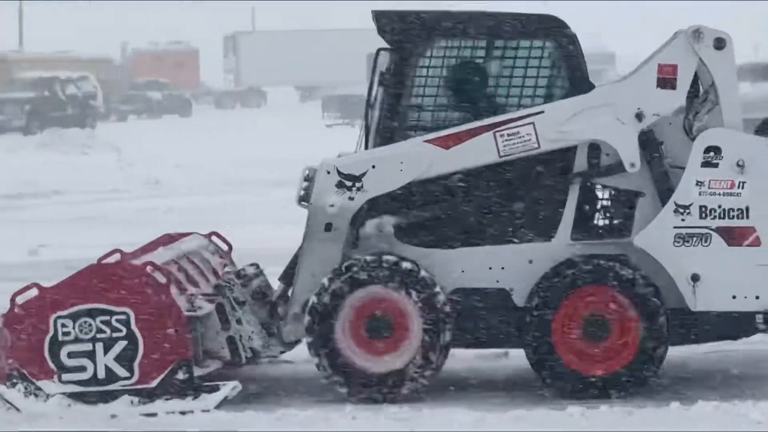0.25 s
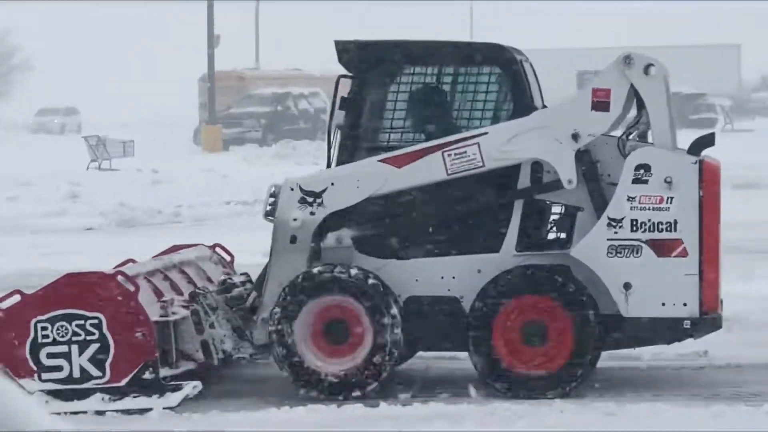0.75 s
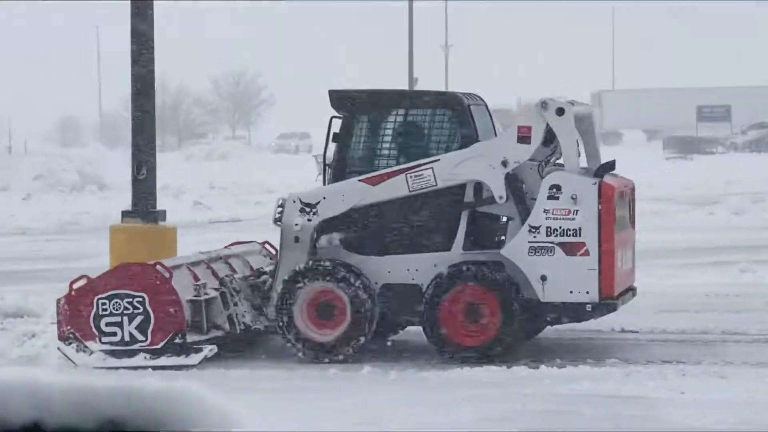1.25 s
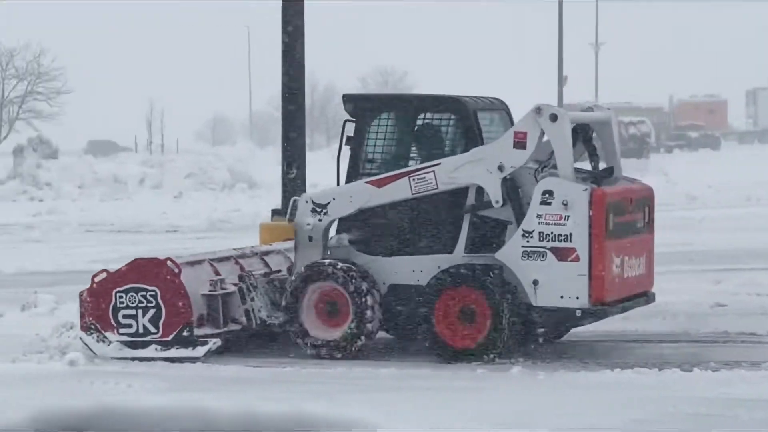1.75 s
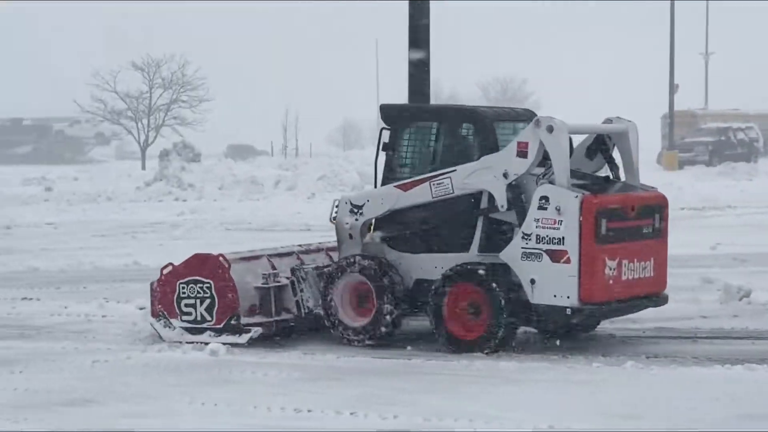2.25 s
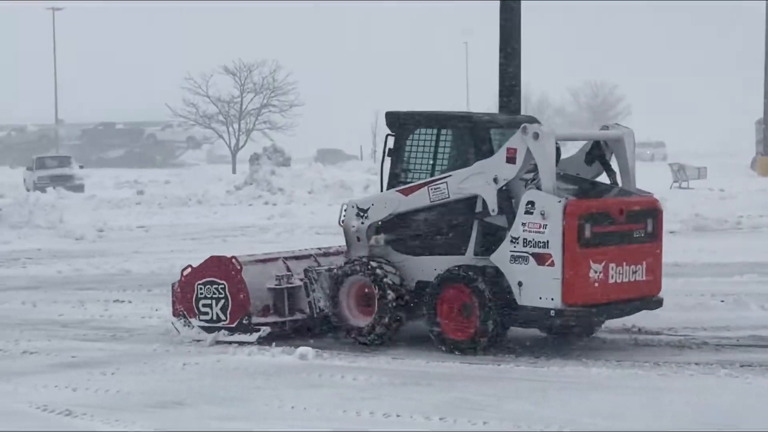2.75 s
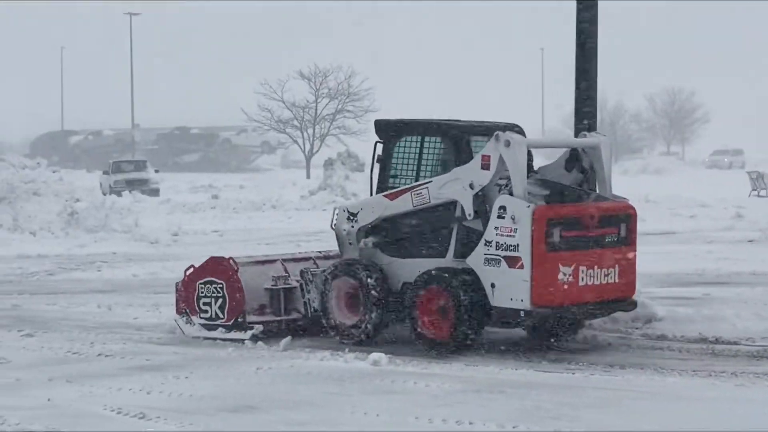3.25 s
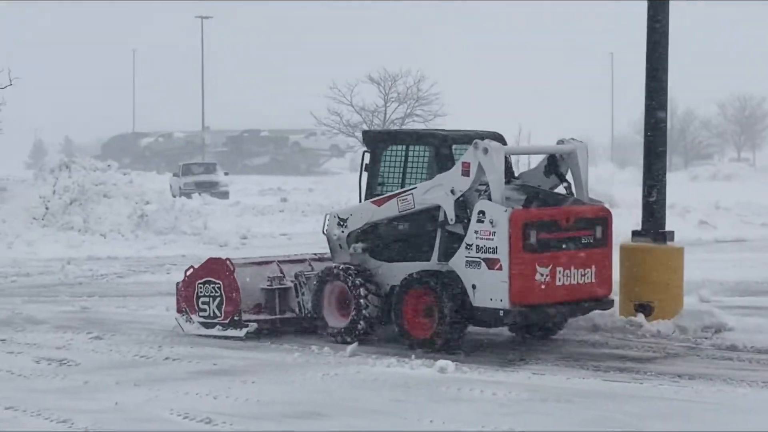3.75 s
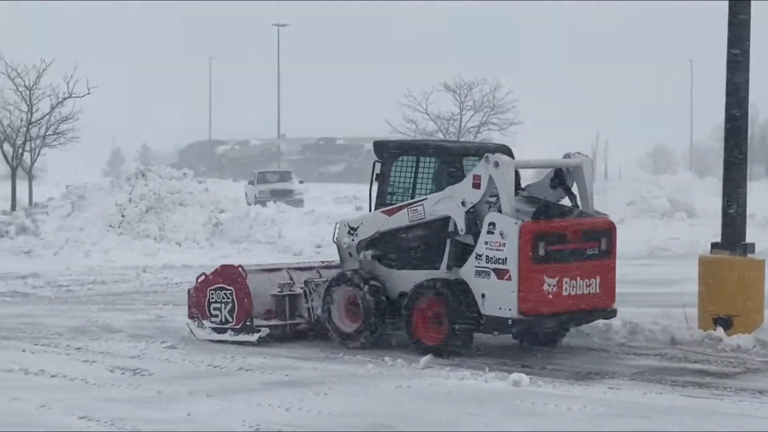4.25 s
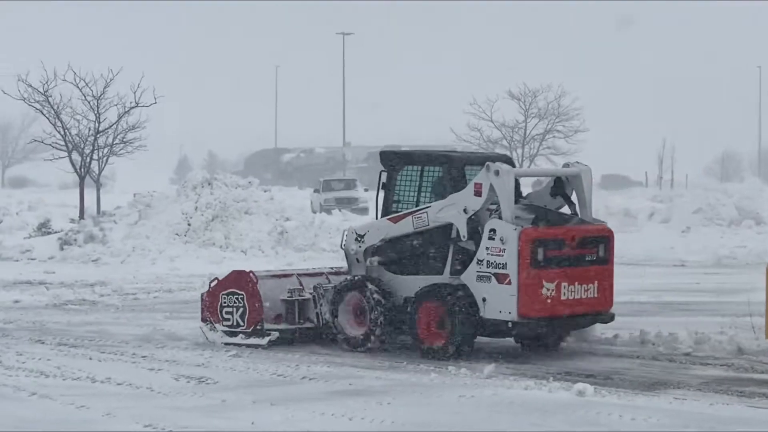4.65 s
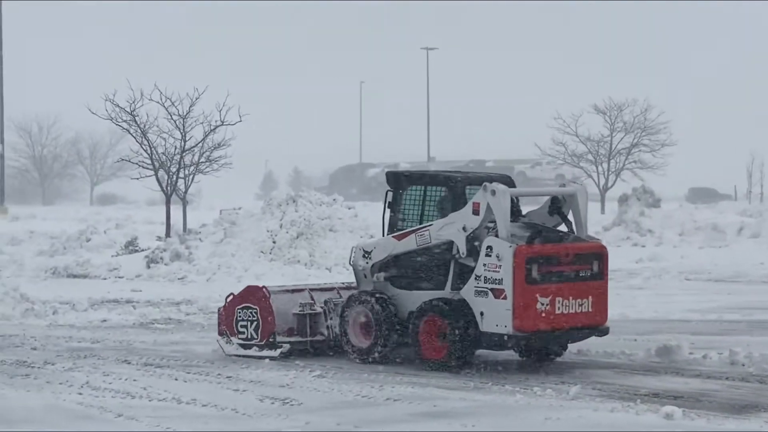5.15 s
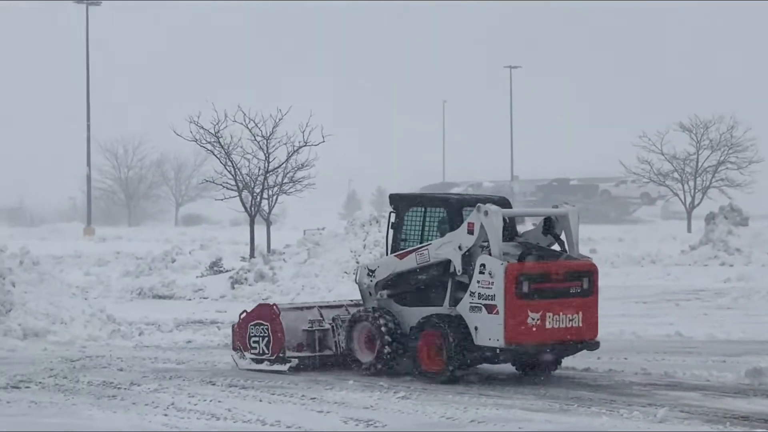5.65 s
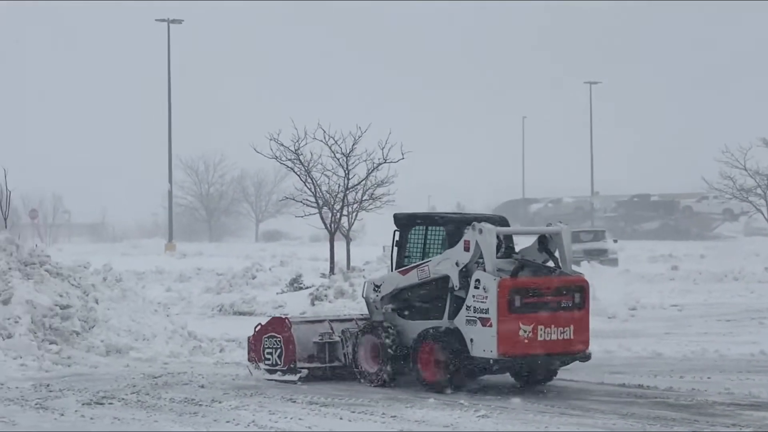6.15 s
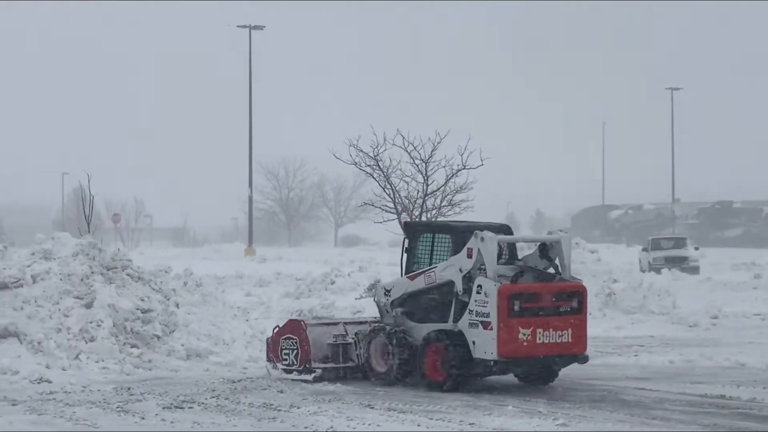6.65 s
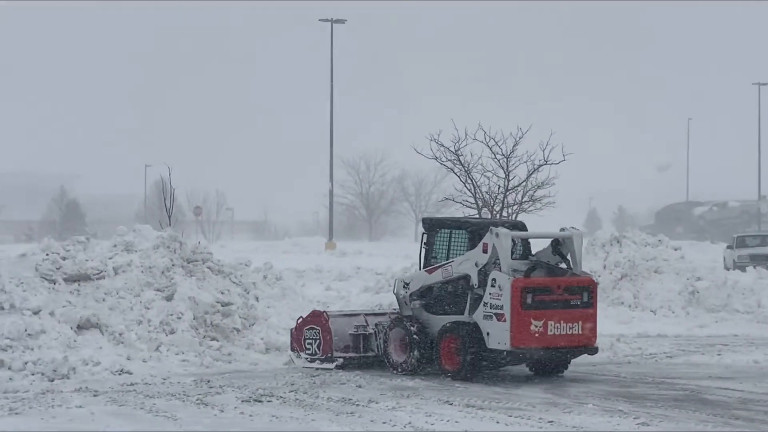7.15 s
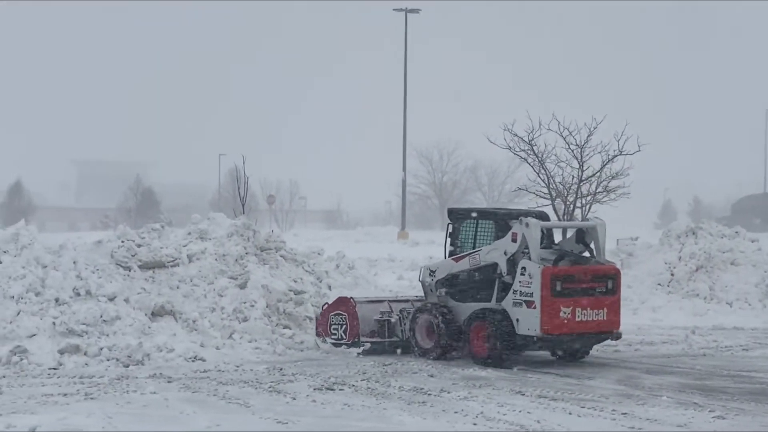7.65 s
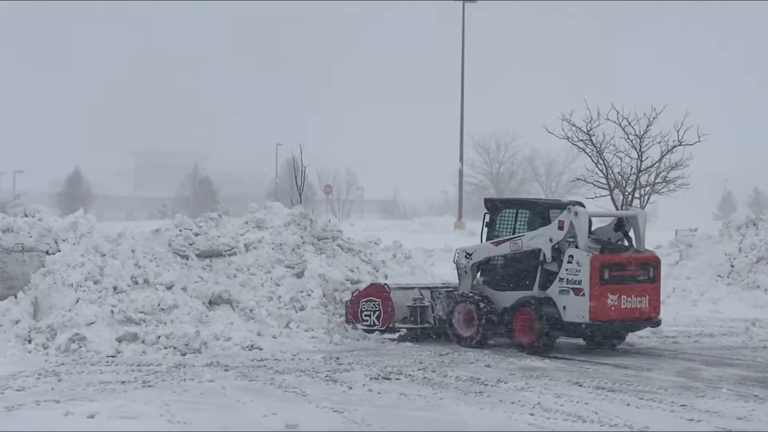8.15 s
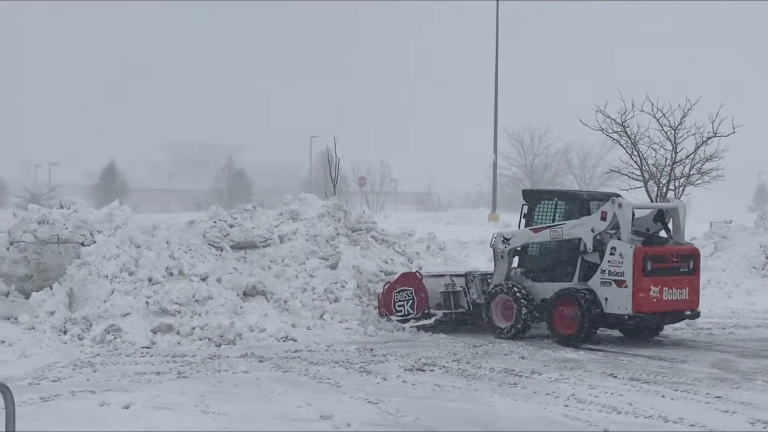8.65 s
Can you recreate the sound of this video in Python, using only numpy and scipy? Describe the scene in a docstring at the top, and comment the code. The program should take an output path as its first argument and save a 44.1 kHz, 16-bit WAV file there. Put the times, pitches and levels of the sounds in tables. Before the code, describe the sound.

Outdoors in an open snowy lot, a small diesel loader runs hard close to the microphone, with a low steady drone, whining drive pump, fan rush and gritty snow crunch. A short gust passes early. The machine slowly recedes with groans and faint skid whistles. Past the middle, strong wind buffets the microphone, the drone drops away quickly, and fan, clatter and crunch remain between irregular thumps.

```python
"""A diesel skid-steer loader pushes snow across an open lot at full throttle, close by and slowly receding.
From the start four cylinders drone, the drive pump whines, fan and engine bay rush, and snow crunches.
Bands of machine noise glide in pitch, a short gust passes near 1 s, drive and skids groan and whistle.
In the second half gusts and eddies buffet the microphone, the drone fades, and a high click falls near 8 s.
Engine, pump and snow bursts follow one count of cylinder firings; the rest is shaped noise and swings."""
import sys
import numpy as np
from scipy import signal
from scipy.fft import rfft, irfft, next_fast_len
from scipy.io import wavfile
from scipy.ndimage import uniform_filter1d, map_coordinates

SR = 44100
rng = np.random.default_rng(int(sys.argv[2]) if len(sys.argv) > 2 else 0)


def unload_audio(sound):
    """Save the sound as a 16-bit wav file, at the path given as the first command line argument."""
    columns = np.transpose(np.atleast_2d(sound))
    # keep every value between -1 and 1, then stretch to whole-number steps
    steps = np.round(np.clip(columns, -1, 1) * 32767)
    wavfile.write(sys.argv[1], SR, steps.astype(np.int16))


N = 392931


def amp(db):
    """Decibels to gain."""
    return 10 ** (np.asarray(db) / 20)


def unit(x):
    """Scaled to rms 1."""
    return x / np.sqrt(np.mean(x ** 2) + 1e-20)


def curves(rows):
    """One value per sample for each column after the time."""
    knots_s, *columns = np.transpose(rows)
    return [np.interp(np.arange(N) / SR, knots_s, column) for column in columns]


def wobble(knots_hz):
    """A smooth random curve with knots_hz knots a second."""
    knots = rng.standard_normal(int(N * knots_hz / SR) + 4)
    return map_coordinates(knots, [np.arange(N) * knots_hz / SR])


def swell(start_s, length_s, rise_s, fall_s):
    """A Gaussian-edged envelope that reaches 1 at start_s, holds for length_s and falls."""
    t = np.arange(N) / SR
    outside = np.maximum((start_s - t) / rise_s, (t - start_s - length_s) / fall_s)
    return np.exp(-np.clip(outside, 0, 2 * np.pi) ** 2)


def filtered(x, response):
    """x times a response of frequency."""
    m = next_fast_len(N + SR // 2)
    spectrum = rfft(x, m) * response(np.fft.rfftfreq(m, 1 / SR))
    return irfft(spectrum, m)[..., :N]


def along(points, hz):
    """Gain of (Hz, dB) points, read on a log axis."""
    points_hz, points_db = np.transpose(points)
    return amp(np.interp(np.log(hz + 1), np.log(points_hz), points_db))


def coloured(x, points):
    """x through a (Hz, dB) spectrum, at rms 1."""
    return unit(filtered(x, lambda hz: along(points, hz)))


def resonance(hz, centre_hz, width_hz):
    """Response of one damped mode."""
    damping = 1j * hz * width_hz
    return damping / (centre_hz ** 2 - hz ** 2 + damping)


def noise(side_db):
    """White stereo noise: a shared mid plus a side at side_db that is opposed in the two channels."""
    mid, side = rng.standard_normal((2, N))
    return unit(np.array([mid + amp(side_db) * side, mid - amp(side_db) * side]))


def tone(cycles, drift_rad, shimmer_db):
    """A tone of rms 1 that wavers in phase and strength."""
    wave = np.sin(2 * np.pi * cycles + drift_rad * wobble(9))
    return unit(wave * amp(shimmer_db * wobble(22.03)))


def howl(centre_hz, half_width_hz):
    """A narrow band of noise at rms 1 around a moving pitch, 12 dB down at half_width_hz."""
    a, b = filtered(rng.standard_normal((2, N)), lambda hz: 1 / (1 + (hz / half_width_hz) ** 2) ** 2)
    phase = 2 * np.pi * np.cumsum(centre_hz) / SR
    return unit(a * np.cos(phase) + b * np.sin(phase))


def patchy(x, depth_db):
    """Gives noise slowly shifting patches of strength across frequency."""
    bins = signal.stft(x, nperseg=1024)[2]
    patch = np.outer(np.hanning(7), np.hanning(21))
    field = signal.fftconvolve(rng.standard_normal(bins.shape[1:]), patch, "same")
    return signal.istft(bins * amp(depth_db * unit(field)), nperseg=1024)[1][:, :N]


def steady(x):
    """Noise with its fast lumps kept and its slow swells evened out."""
    power = uniform_filter1d(np.mean(x ** 2, axis=0), size=1500)
    return x / np.sqrt(np.abs(power) + 1e-9)


def firing_gate(firings, depth, scatter_db):
    """A burst at each firing, with random differences in strength."""
    burst = np.sin(np.pi * firings) ** 2
    strength_db = scatter_db * rng.standard_normal(1024)[firings.astype(int)]
    return unit(amp(strength_db * burst) * np.exp(2 * depth * burst))


# Engine speed, sagging under load. Each row: time in seconds, firing rate in Hz.
ENGINE_SPEED = [(0, 87.6), (.5, 88.5), (.78, 87.3), (1.0, 89.7), (1.35, 86), (1.57, 85), (1.8, 88),
                (2.02, 88.9), (2.3, 85.3), (2.6, 87), (3.2, 86.9), (3.5, 88.7), (3.9, 87.4), (4.15, 84.7),
                (4.45, 87.3), (6.2, 87.4), (7.3, 80), (8.1, 82), (8.9, 91)]


def firing_rate_hz():
    """Cylinder firings per second, the pace of the engine and the pump."""
    return curves(ENGINE_SPEED)[0]


FADE_STARTS_S, FADE_TIME_S, FADE_LOSS_DB = 5.73, 0.24, 21.5


def fade_db():
    """How far drone and pump whine have sunk: a quick exponential approach in dB."""
    since_s = np.maximum(np.arange(N) / SR - FADE_STARTS_S, 0)
    return FADE_LOSS_DB * np.expm1(-since_s / FADE_TIME_S)


# Shaft and belt tones. Each row: multiple of the firing rate, dB against the firing tone before lugging.
SHAFT_TONES = [(1.55, -30), (2, -21.5), (3.5, -20.5), (4.68, -27.5), (6.67, -24)]
# Hums that hold their pitch whatever the load. Each row: pitch in Hz, dB against the firing tone.
STEADY_HUMS = [(40, -20.5), (70, -14), (119, -15.5), (205.5, -14)]
DRONE_DB = -22  # firing tone before the fade
LUG_HZ, LUG_DB_PER_HZ, LUG_MOST_DB = 87, 3, 5  # shaft tones swell below this firing rate


def exhaust(firings):
    """A clean firing tone among steady hums and weaker shaft tones, which swell when the engine labours."""
    firing = tone(firings, drift_rad=.03, shimmer_db=.4)
    shafts = sum(amp(db) * tone(multiple * firings, drift_rad=0.24 * multiple, shimmer_db=2.5)
                 for multiple, db in SHAFT_TONES)
    lug_db = np.clip(LUG_DB_PER_HZ * (LUG_HZ - firing_rate_hz()), 0, LUG_MOST_DB)
    hums = sum(amp(db) * tone(hz * np.arange(N) / SR, drift_rad=0.23, shimmer_db=1.5)
               for hz, db in STEADY_HUMS)
    drone = firing + amp(lug_db) * shafts + hums
    return amp(DRONE_DB + fade_db()) * drone * amp([[-.4], [.4]])  # slightly right


# The drive pump as it takes load. Each row: time in seconds, whine in dB before the fade.
PUMP_WHINE = [(0, -35), (.35, -33.5), (.45, -37.5), (.75, -41), (.86, -34.5), (1.0, -30.5), (1.25, -29.5),
              (1.57, -26.5), (1.77, -34.5), (2.02, -26.5), (2.15, -31.5), (2.28, -39.5), (4.0, -41.5),
              (4.2, -36), (5.8, -37.5)]
SING_HZ, SING_HALF_WIDTH_HZ, SING_DB, SING_ENDS_S, SING_FALL_S = 2955, 41, -52, 0.48, 0.44


def pump(firings):
    """The belt-driven piston pump whines louder under load; a thin whistle sings above it while side-on."""
    load = amp(curves(PUMP_WHINE)[0] + fade_db())
    strokes = 5.35 * firings
    whine = tone(strokes, drift_rad=.15, shimmer_db=.8)
    ripple = amp(1.6 * wobble(70))
    side_on = swell(0, SING_ENDS_S, SING_FALL_S, SING_FALL_S)
    whistle = howl(np.full(N, SING_HZ), SING_HALF_WIDTH_HZ)
    return load * unit(ripple * whine) + amp(SING_DB) * side_on * whistle


SIDE_ON_S, TURN_S = 1.34, 1.27  # stays side-on, then turns its tail
GROWL_DB, GROWL_HZ, GROWL_WIDTH_HZ = -28, 186, 136  # width of each of two equal passes


def growl(firings):
    """The engine bay growls out of its side: a throaty band that pulses with the firings."""
    throb = noise(side_db=-16.0) * firing_gate(firings, depth=0.38, scatter_db=-0.5)
    bay = unit(filtered(throb, lambda hz: resonance(hz, GROWL_HZ, GROWL_WIDTH_HZ) ** 2))
    return amp(GROWL_DB) * swell(0, SIDE_ON_S, TURN_S, TURN_S) * bay


# The machine as it turns and recedes. Each row: time in seconds, fan in dB, clatter in dB, before trims.
MACHINE_LEVELS = [(0, -36.5, -46.5), (.17, -35.5, -43), (.46, -40, -48), (1.87, -34, -44), (2.25, -37, -43),
                  (3.03, -34, -45.5), (4.7, -35, -43.5), (5.26, -32, -42), (5.7, -34, -44),
                  (5.94, -35.5, -48.5), (6.01, -32.5, -46), (6.86, -36, -47), (7.35, -36, -47.5),
                  (7.68, -34, -48.5), (7.9, -33.5, -45.5), (8.31, -34.5, -46), (8.46, -35.5, -45),
                  (8.7, -35, -49.5)]
# Exhaust and chassis roar. Each row: frequency in Hz, relative density in dB per Hz.
BODY_SPECTRUM = [(22, -48), (31, -35), (40, 1), (60, -1), (85, 2), (112, 5.5), (150, -3), (200, -4),
                 (340, -9.5), (560, -8), (740, -11), (1000, -19), (1330, -42), (4500, -120)]
# Fan duct modes. Each row: centre in Hz, width in Hz, relative gain in dB.
DUCT_MODES = [(1043, 68.6, 18), (1100, 157, 8.5)]
# Combustion clatter. Each row: frequency in Hz, relative density in dB per Hz.
CLATTER_SPECTRUM = [(900, -44), (1380, -12), (1570, 5), (1900, 3), (2800, 1), (3400, -2.5), (3900, -7),
                    (4400, -8), (5500, -23), (7500, -45), (11000, -120)]
BODY_DB, BODY_FADE_SHARE = -26.5, 0.19  # roar before its share of the drone's fade


def duct(hz):
    """The fan duct's modes, each a resonance narrowed by a wider one at the same pitch."""
    return sum(amp(db) * resonance(hz, centre_hz, width_hz) * resonance(hz, centre_hz, 5 * width_hz)
               for centre_hz, width_hz, db in DUCT_MODES)


def machine(firings, sway_db):
    """Chassis roar, the fan in its duct, and combustion clatter; roar and clatter pulse with the firings."""
    fan_db, clatter_db = curves(MACHINE_LEVELS)
    roar = noise(side_db=-16.5) * firing_gate(firings, depth=0.14, scatter_db=1.35)
    body = coloured(roar, BODY_SPECTRUM)
    fan = unit(filtered(noise(side_db=-6.5), duct)) * amp([[-1.1], [1.1]])
    knocks = patchy(noise(side_db=-46.0), depth_db=1.54)
    knocks = knocks * firing_gate(firings, depth=0.022, scatter_db=1.5)
    clatter = coloured(knocks, CLATTER_SPECTRUM)
    body = amp(BODY_DB + BODY_FADE_SHARE * fade_db()) * body
    return body + amp(fan_db + 0.5) * fan + amp(clatter_db + 4.5 + sway_db) * clatter


# Snow under blade and tyres. Each row: time in seconds, crunch in dB, fizz in dB, before trims.
SNOW_LEVELS = [(0, -52.5, -59), (.15, -49, -58), (.5, -54.5, -61), (1.04, -54, -62), (1.96, -49.5, -57),
               (2.55, -51, -60), (2.71, -54, -59), (2.8, -49, -58.5), (3.3, -52, -59.5),
               (5.34, -50.5, -60.5), (6.33, -55.5, -65.5), (6.6, -53.5, -61), (6.7, -56, -66),
               (7.03, -54, -62.5), (7.12, -56, -64), (7.4, -55.5, -64), (7.55, -53, -60),
               (7.7, -54.5, -60.5), (7.99, -49.5, -59), (8.26, -54.5, -62.5), (8.41, -50, -62),
               (8.64, -59, -67), (8.76, -50.5, -63), (8.91, -58, -65)]
# Snow crunch. Each row: frequency in Hz, relative density in dB per Hz.
CRUNCH_SPECTRUM = [(2000, -17), (4000, -1), (5000, 4), (6700, -.5), (8000, -4), (10000, -18.5),
                   (13000, -23)]
# Fizz of fine powder. Each row: frequency in Hz, relative density in dB per Hz.
FIZZ_SPECTRUM = [(6000, -26), (8800, -1.5), (11000, 1), (12300, -7), (15500, -8.5)]
# Treble balance; some bands are opposed between channels. Each row: frequency in Hz, side against mid in dB.
TREBLE_SIDE = [(3000, -6), (5800, -8), (7700, -35), (8400, 27.5), (9700, -2.5), (11000, -8), (12300, -4),
               (13600, 17), (15500, -6)]


def snow(firings, sway_db):
    """Snow crunches unevenly under the shuddering blade, with a finer fizz above."""
    crunch_db, fizz_db = curves(SNOW_LEVELS)
    mid, side = patchy(rng.standard_normal((2, N)), depth_db=2.0)
    mid = filtered(mid, lambda hz: np.cos(np.arctan(along(TREBLE_SIDE, hz))))
    side = filtered(side, lambda hz: np.sin(np.arctan(along(TREBLE_SIDE, hz))))
    shudder = amp(sway_db + 0.28 * wobble(170)) * firing_gate(firings, depth=0.085, scatter_db=1.3)
    grains = np.array([mid + side, mid - side]) * shudder
    crunch = amp(crunch_db + 2.0) * coloured(grains, CRUNCH_SPECTRUM)
    return crunch + amp(fizz_db + 2.5) * coloured(grains, FIZZ_SPECTRUM)


# Whirr of the drive motors. Each row: time in seconds, pitch in Hz, level in dB before a trim.
MOTOR_WHIRR = [(1.5, 3040, -60), (2.7, 3060, -48.5), (3.6, 3325, -47.5), (4.3, 3293, -40), (5.4, 3307, -48),
               (6.6, 3470, -43), (7.4, 3420, -47), (8.3, 3400, -50), (8.9, 3330, -45)]
# Steel skids on packed snow. Each row: start in seconds, length in seconds, pitch in Hz, level in dB.
SKID_WHISTLES = [(2.3, 0.36, 4680, -51.5), (3.901, .5, 4540, -51.5), (4.804, .15, 4660, -54),
                 (5.254, .2, 4570, -50), (6.398, .19, 4480, -57)]
SKID_RISE_S, SKID_FALL_S, SKID_WANDER_HZ = 0.16, 0.12, 59.1


def running_gear():
    """The drive motors whirr, and the skids whistle unsteadily whenever they bite."""
    whirr_hz, whirr_db = curves(MOTOR_WHIRR)
    whirr = amp(whirr_db - 4.5) * howl(whirr_hz, half_width_hz=420)
    bite = sum(amp(db) * swell(s, length_s, SKID_RISE_S, SKID_FALL_S)
               for s, length_s, _, db in SKID_WHISTLES)
    pitch_hz, = curves([(s + length_s / 2, hz) for s, length_s, hz, _ in SKID_WHISTLES])
    whistle = howl(pitch_hz + SKID_WANDER_HZ * wobble(4), half_width_hz=250)
    return whirr + bite * whistle


def glides(rows, rise_s, fall_s):
    """Narrow bands of noise that swell, glide in pitch and fall."""
    out = 0
    for s, length_s, first_hz, last_hz, half_width_hz, db in rows:
        glide_hz, = curves([(s, first_hz), (s + length_s, last_hz)])
        out = out + amp(db) * swell(s, length_s, rise_s, fall_s) * howl(glide_hz, half_width_hz)
    return out


# Peaks of the ground reflection. Each row: start in seconds, length in seconds, first pitch in Hz,
# last pitch in Hz, half-width in Hz, level in dB before the sway.
REFLECTION_GLIDES = [(.1, 0.33, 1744, 1723, 300, -40.5), (.3, 0.18, 1725, 1735, 45, -48),
                     (.65, 0.33, 1750, 1740, 150, -45), (.97, 0.14, 1703, 1624, 60, -44),
                     (1.25, 0.053, 1620, 1625, 90, -38), (1.5, 0.069, 1618, 1605, 50, -43.5),
                     (1.68, 0.38, 1873, 1840, 70, -49), (1.85, 0.58, 1570, 1472, 55, -45.5),
                     (2.22, 0.23, 1790, 1700, 70, -43.5), (2.55, .5, 1744, 1738, 110, -42.5),
                     (2.68, .08, 1500, 1470, 35, -46), (3.0, 0.18, 1500, 1480, 55, -48),
                     (3.15, 0.28, 1675, 1637, 55, -45), (3.2, 1.19, 1760, 1800, 130, -48),
                     (3.5, 0.22, 1637, 1625, 50, -43), (3.8, 0.41, 1665, 1680, 70, -55),
                     (4.4, .22, 1610, 1612, 55, -43.5), (4.6, 1.12, 1753, 1773, 110, -41.5),
                     (4.85, 0.97, 1584, 1660, 90, -51), (6.0, .45, 1710, 1715, 130, -48)]


def ground_reflection():
    """Bands of machine noise glide in pitch as the ground reflection shifts."""
    return glides(REFLECTION_GLIDES, rise_s=.12, fall_s=.13)


# Gusts at the microphone. Each row: start in seconds, length in seconds, rumble in dB, flutter in dB,
# before trims.
WIND_GUSTS = [(0.926, 0.49, -36, -23.5), (5.106, 0.01, -23, -21.5), (5.152, 0.048, -15.3, -20),
              (5.231, 0.024, -15.7, -29), (5.333, 0.015, -15, -21.5), (5.414, 0.035, -13, -24),
              (5.482, 0.047, -19.5, -31), (5.57, 0.0099, -21, -39), (5.627, 0.053, -20.5, -31),
              (5.702, 0.075, -12, -18.5), (5.815, 0.058, -20.5, -22.5), (5.892, 0.0065, -23, -22),
              (6.019, 0.028, -28, -36), (6.12, 0.087, -28, -35.5), (6.232, 0.035, -23, -26),
              (6.295, 0.06, -27.5, -26), (6.391, 0.01, -23, -27.5), (6.436, 0.055, -28, -27),
              (6.511, 0.022, -22, -26.5), (6.569, 0.037, -27.5, -28), (6.8, 0.057, -29, -32),
              (6.896, 0.067, -25, -30), (7, 0.06, -33, -32.5), (7.118, 0.066, -26, -31),
              (7.233, 0.067, -25, -28), (7.373, 0.033, -27.1, -28.5), (7.588, 0.04, -30, -27),
              (7.691, 0.025, -28.5, -27.5), (7.788, 0.068, -32, -29), (8.055, 0.033, -24, -28),
              (8.12, 0.028, -22, -21.5), (8.245, 0.0088, -18.5, -25.5), (8.27, 0.087, -21, -21),
              (8.373, 0.039, -15, -17.5), (8.481, 0.066, -21, -22.5), (8.671, 0.057, -20.5, -24.5),
              (8.777, 0.049, -17.5, -20), (8.852, 0.05, -20.5, -25.5)]
# Flutter reach as the wind freshens. Each row: time in seconds, corner in Hz.
FLUTTER_REACH = [(1.3, 185), (5.2, 370), (5.8, 537), (6.3, 700), (7.8, 775), (8.3, 1160)]
# Wind rumble. Each row: frequency in Hz, relative density in dB per Hz.
RUMBLE_SPECTRUM = [(20, -37), (35, -16), (55, 0), (110, -3), (170, -8), (300, -18), (700, -92), (2000, -94)]
GUST_RISE_S, GUST_FALL_S = 0.0084, 0.014
WIND_RISES_S = 5.8  # from then on the air stirs between gusts too
LULL_RUMBLE_DB, LULL_FLUTTER_DB = -33.5, -37.5  # before trims


def flutter_response(hz, corner_hz):
    """A highpass, a gentle slope, and a steep cut at corner_hz."""
    highpass = hz ** 2 / (hz ** 2 + 135 ** 2)
    return highpass / np.sqrt(1 + (hz / 300) ** 2) / np.sqrt(1 + (hz / corner_hz) ** 10)


def buffet(rumble_trim_db, flutter_trim_db):
    """Turbulence at the ports in each gust: a lumpy rumble, and a flutter that reaches higher in faster air."""
    lull = swell(WIND_RISES_S, N / SR, GUST_RISE_S, GUST_FALL_S)
    low, high = amp(LULL_RUMBLE_DB) * lull, amp(LULL_FLUTTER_DB) * lull
    for s, length_s, low_db, high_db in WIND_GUSTS:
        gust = swell(s, length_s, GUST_RISE_S, GUST_FALL_S)
        low = np.maximum(low, amp(low_db) * gust)
        high = np.maximum(high, amp(high_db) * gust)
    rumble = steady(coloured(noise(side_db=-12.5), RUMBLE_SPECTRUM))
    reach_hz, = curves(FLUTTER_REACH)
    air = noise(side_db=-10.0) * amp(5.4 * wobble(130))
    flutter = 0
    for corner_hz in 160 * 2 ** np.arange(4):  # crossfade between octave-spaced corners
        share = np.clip(1 - np.abs(np.log2(reach_hz / corner_hz)), 0, 1)
        flutter = flutter + share * unit(filtered(air, lambda hz: flutter_response(hz, corner_hz)))
    return amp(rumble_trim_db) * low * rumble + amp(flutter_trim_db) * high * steady(flutter)


# Single eddies that slap the microphone. Each row: peak time in seconds, peak level in dB before trim
# and random pan, pitch at the peak in Hz.
EDDY_SLAPS = [(1.1217, -23, 254), (1.1481, -14, 285), (1.1897, -16.3, 283.0), (1.2207, -20, 500),
              (1.297, -14, 178), (1.416, -17, 170), (1.6998, -12, 630), (5.148, -10, 226),
              (5.176, -15, 283.0), (5.2429, -15, 400.0), (5.3404, -9.5, 453), (5.4183, -19, 317.0),
              (5.429, -10, 252.0), (5.4464, -14, 449.0), (5.572, -8, 109), (5.717, -10.7, 317.0),
              (5.7434, -4.5, 354), (5.7645, -11.7, 566.0), (5.7738, -14, 317.0), (5.7848, -17, 283.0),
              (5.8036, -5, 440), (5.8332, -10, 500), (5.8411, -8.5, 490), (6.241, -18, 356.0),
              (6.2584, -12, 447), (6.308, -15.5, 400.0), (6.352, -16, 317.0), (6.439, -15, 400.0),
              (6.4834, -16, 449.0), (6.4961, -12.9, 630), (6.5725, -18.5, 449.0), (6.5825, -14, 356.0),
              (6.704, -20, 300), (6.8899, -18.2, 449.0), (6.9062, -15, 449.0), (6.9359, -16, 635.0),
              (7.0116, -10, 453), (7.1226, -19.9, 449.0), (7.177, -20, 500), (7.2484, -17, 504.0),
              (7.2616, -17, 504.0), (7.278, -13, 400.0), (7.3813, -13.5, 497), (7.3966, -17.2, 566.0),
              (7.6026, -19, 449.0), (7.791, -17, 397), (7.8484, -18.5, 500), (8.1105, -21, 800),
              (8.1228, -10, 398), (8.1374, -8.5, 500), (8.18, -11.5, 566.0), (8.214, -15, 595),
              (8.2758, -13, 566.0), (8.288, -10, 713.0), (8.306, -14.0, 557), (8.3258, -13.7, 504.0),
              (8.3355, -12, 504.0), (8.3457, -13, 566.0), (8.3826, -11, 252.0), (8.403, -7, 696),
              (8.465, -5, 560), (8.4896, -11, 800.0), (8.5094, -15, 700), (8.5415, -18, 800.0),
              (8.666, -16, 950), (8.676, -15, 449.0), (8.6846, -14.4, 400.0), (8.7065, -15, 504.0),
              (8.7825, -18, 713.0), (8.809, -9.5, 635.0), (8.8573, -15, 560), (8.8693, -10.5, 449.0)]
EDDY_RISE_CYCLES, EDDY_FALL_CYCLES, EDDY_SLOWS_PER_CYCLE, EDDY_END_SHARE = .95, 1.1, .7, .28


def eddies(trim_db):
    """Each eddy is a swing of pressure that starts fast and small, swells as it slows, and dies low."""
    out, lead = np.zeros((2, N + SR)), SR // 50
    t = np.arange(-lead, SR // 12) / SR
    for s, db, hz in EDDY_SLAPS:
        phase_cycles, pan_db = rng.standard_normal(2)
        age = np.maximum(hz * t, -np.pi)  # in cycles from its peak
        slowing = -np.expm1(-EDDY_SLOWS_PER_CYCLE * age) / EDDY_SLOWS_PER_CYCLE
        cycles = EDDY_END_SHARE * age + (1 - EDDY_END_SHARE) * slowing
        rise = np.exp(-(age / EDDY_RISE_CYCLES) ** 2)
        fall = 1 / np.cosh(age / EDDY_FALL_CYCLES)
        swing = np.where(age < 0, rise, fall) * np.sin(2 * np.pi * (cycles + phase_cycles))
        first = round(s * SR) - lead
        out[:, first:first + len(t)] += amp(db + trim_db + pan_db * np.array([[1], [-1]])) * swing
    return out[:, :N]


# The drive under the blade's push. Each row: start in seconds, length in seconds, first pitch in Hz,
# last pitch in Hz, half-width in Hz, level in dB.
DRIVE_GROANS = [(1.55, .11, 270, 331, 130, -33), (2.0, .19, 410.7, 373, 130, -34),
                (2.6, 0.82, 592, 581, 131, -36.5), (2.8, 0.36, 3160, 3180, 170, -47.5),
                (3.2, 1.4, 3750, 3845, 700, -50.5), (6.2, .9, 3650, 3780, 600, -58)]


def groans():
    """The drive groans and keens as the blade pushes."""
    return glides(DRIVE_GROANS, rise_s=0.14, fall_s=0.18)


# Brief scrapes, and one very short high click near 8 s. Each row: peak time in seconds, level in dB,
# centre in Hz, width of each of two equal passes in Hz, Gaussian time constant in seconds.
SCRAPES_AND_CLICK = [(2.645, -45, 5100, 4000, 0.016), (8.026, -42, 11300, 7170, .0008),
                     (8.438, -35.5, 5300, 1970, .01)]


def scrapes():
    """Brief scrapes and one high click, each a noise burst in a band of its own."""
    t = np.arange(N) / SR
    hiss = noise(side_db=-15)
    out = 0
    for s, db, centre_hz, width_hz, length_s in SCRAPES_AND_CLICK:
        band = unit(filtered(hiss, lambda hz: resonance(hz, centre_hz, width_hz) ** 2))
        out = out + amp(db) * np.exp(-((t - s) / length_s) ** 2) * band
    return out


def scene():
    """The loader, paced by its firings, and the wind."""
    firings = np.cumsum(firing_rate_hz()) / SR
    sway_db = 0.92 * wobble(8)  # the treble wavers on the moving air
    engine = exhaust(firings) + growl(firings) + machine(firings, sway_db)
    drive = pump(firings) + amp(sway_db) * (running_gear() + ground_reflection()) + groans()
    wind = buffet(rumble_trim_db=3.0, flutter_trim_db=0.5) + eddies(trim_db=-0.6)
    return engine + drive + snow(firings, sway_db) + wind + scrapes()


TOP_HZ = 15800


def record(dry):
    """The strongest peaks are rounded off; nothing passes above the band limit."""
    rounded = dry / (1 + np.abs(dry / .92) ** 6) ** (1 / 6)
    return filtered(rounded, lambda hz: hz < TOP_HZ)


dry = scene()
out = record(dry)
unload_audio(out)
```